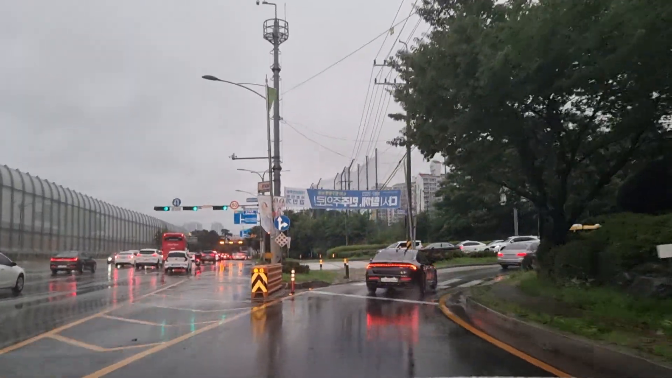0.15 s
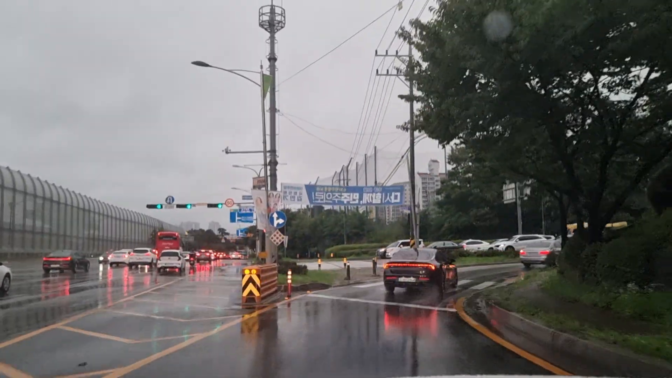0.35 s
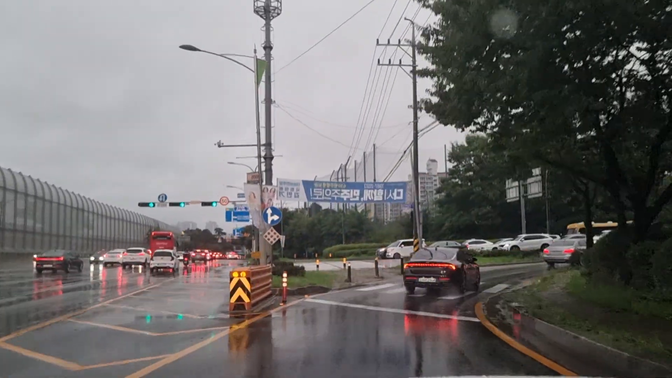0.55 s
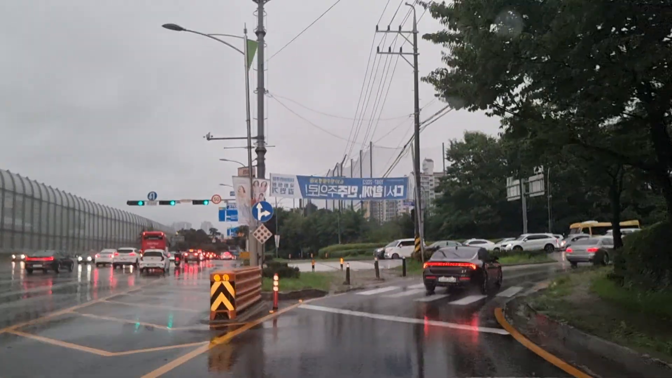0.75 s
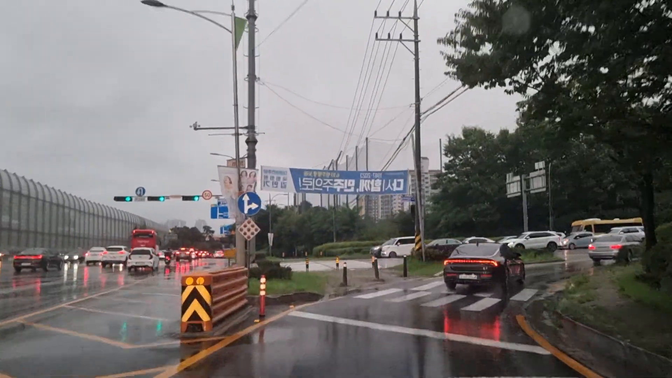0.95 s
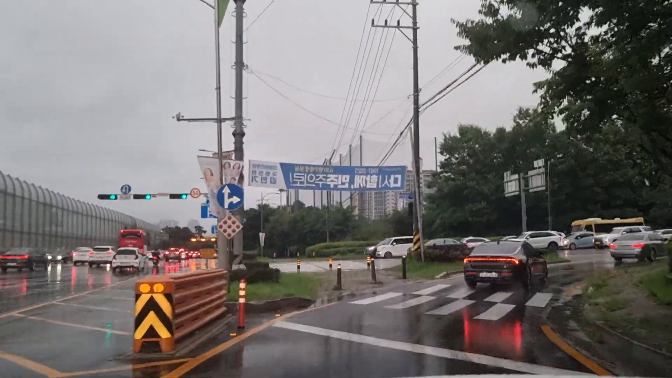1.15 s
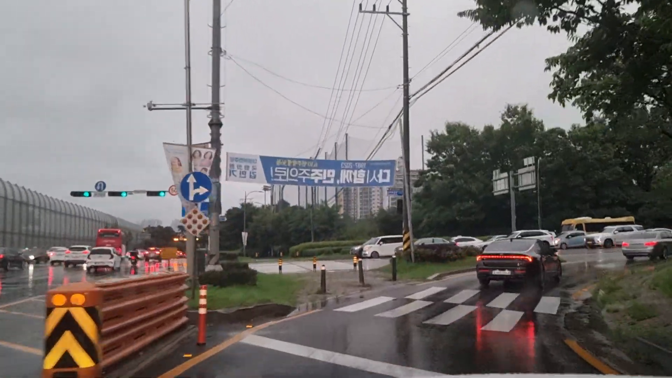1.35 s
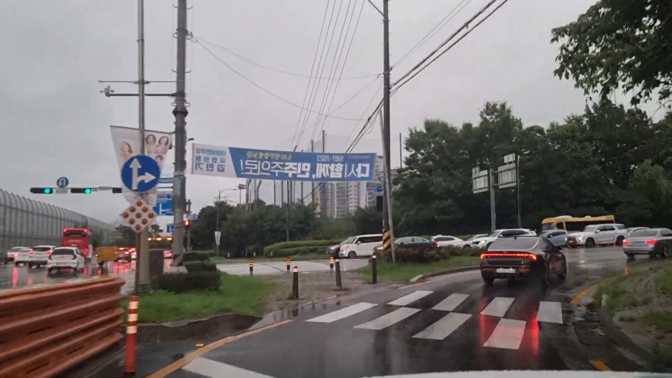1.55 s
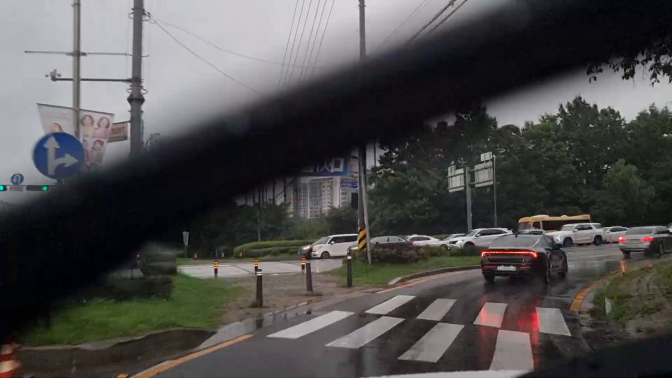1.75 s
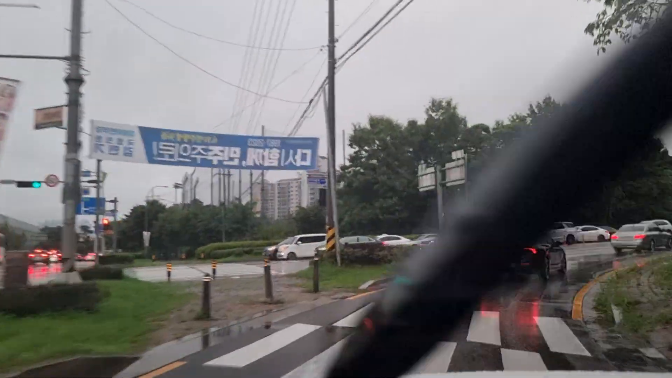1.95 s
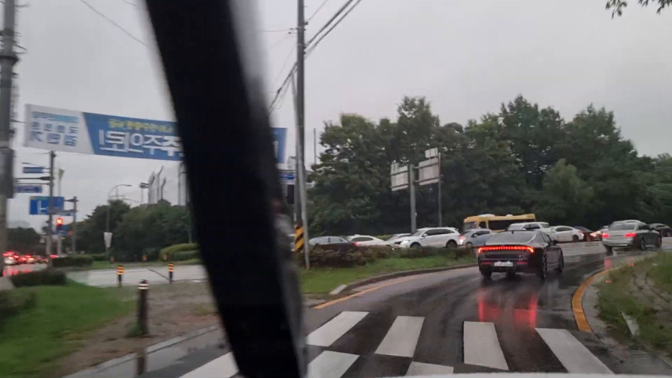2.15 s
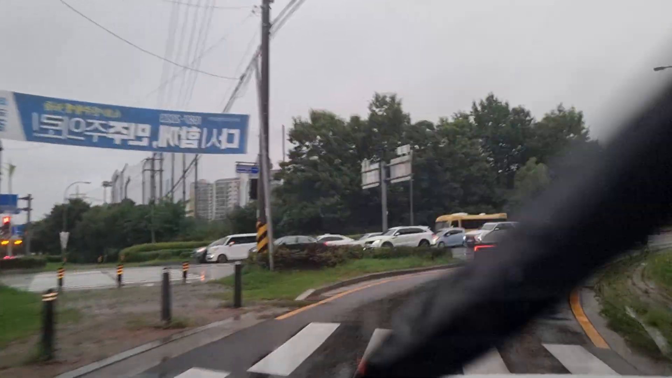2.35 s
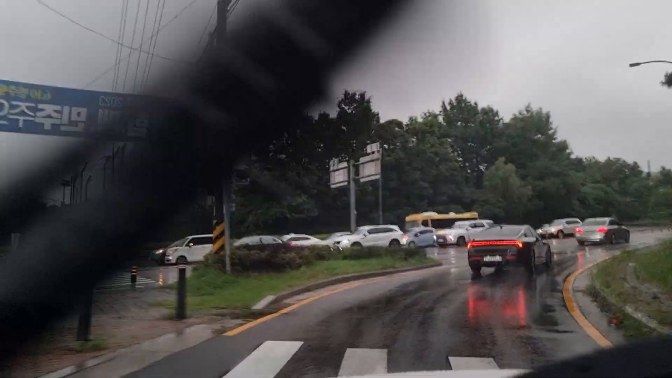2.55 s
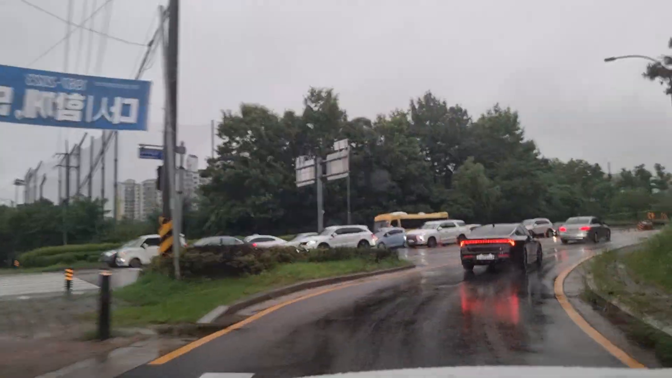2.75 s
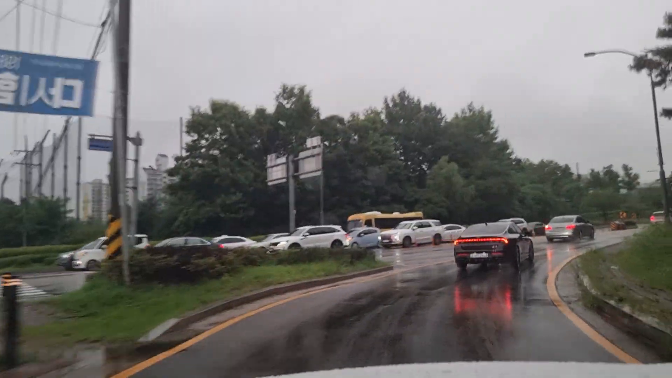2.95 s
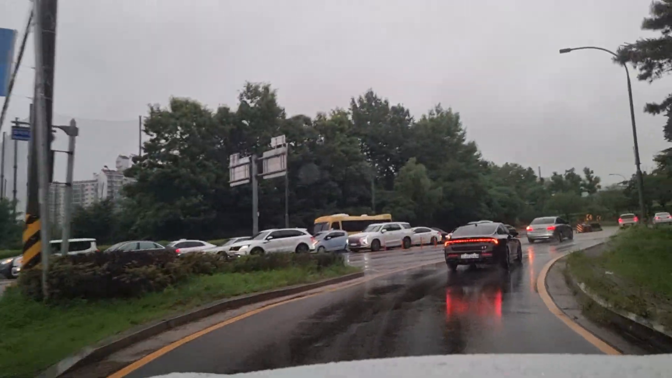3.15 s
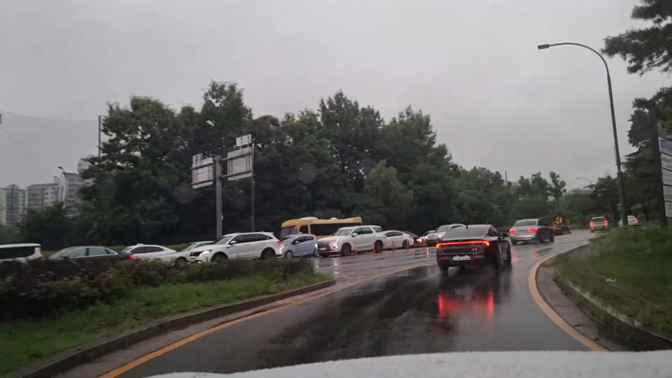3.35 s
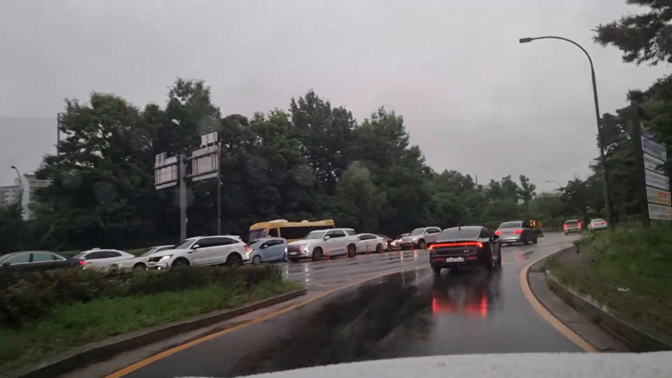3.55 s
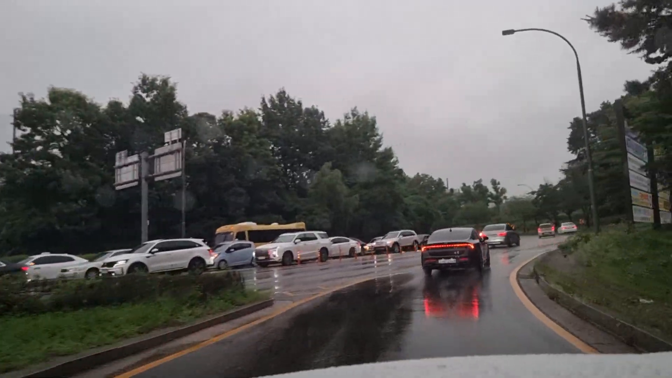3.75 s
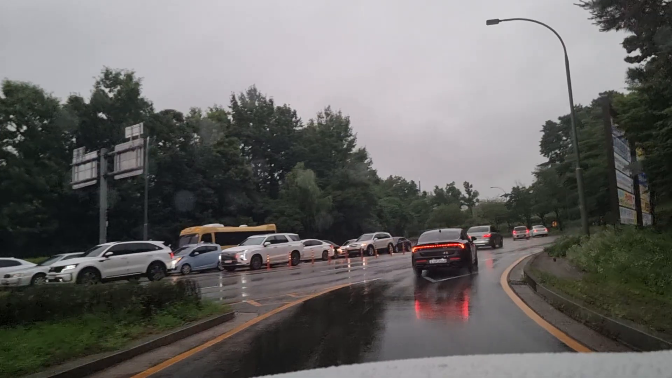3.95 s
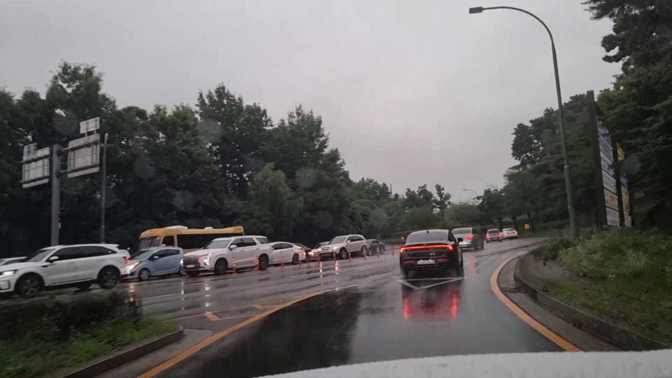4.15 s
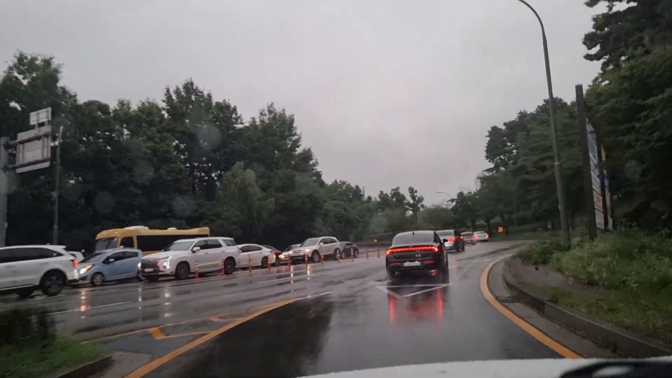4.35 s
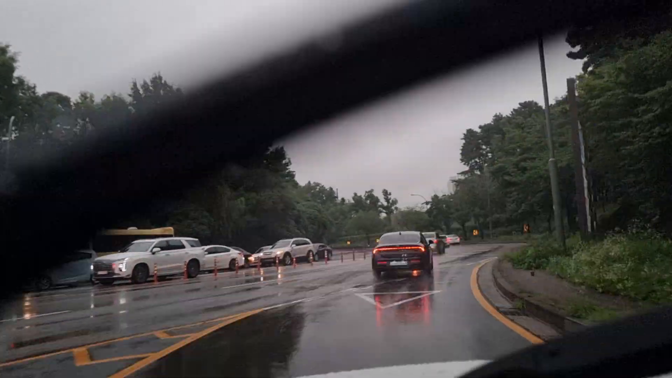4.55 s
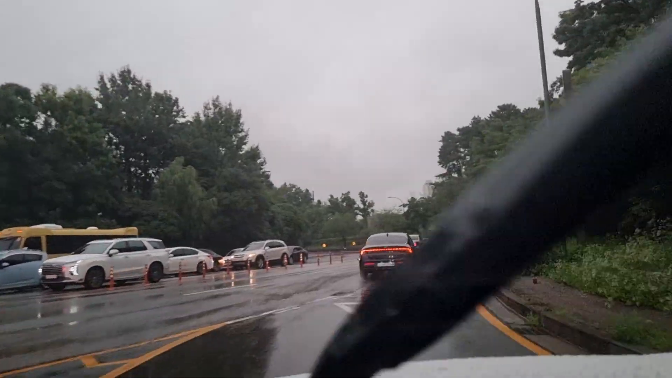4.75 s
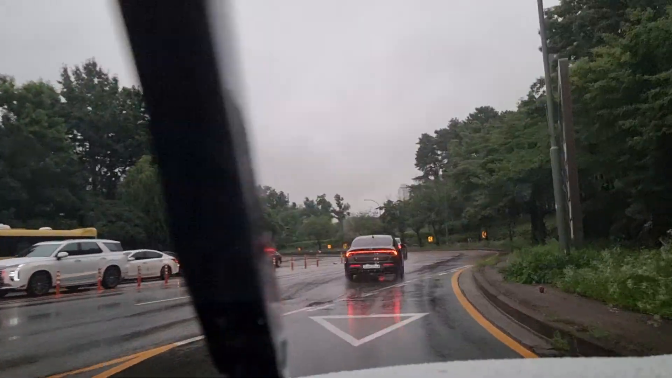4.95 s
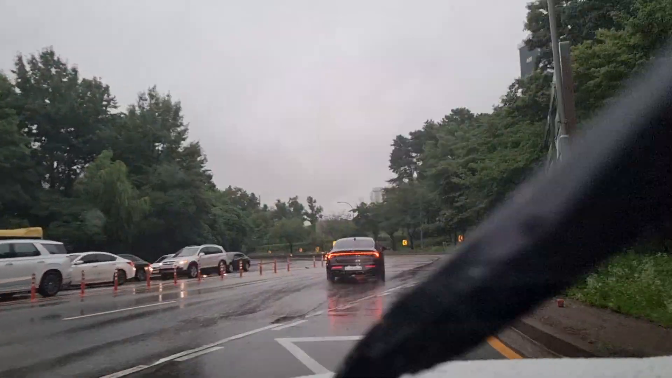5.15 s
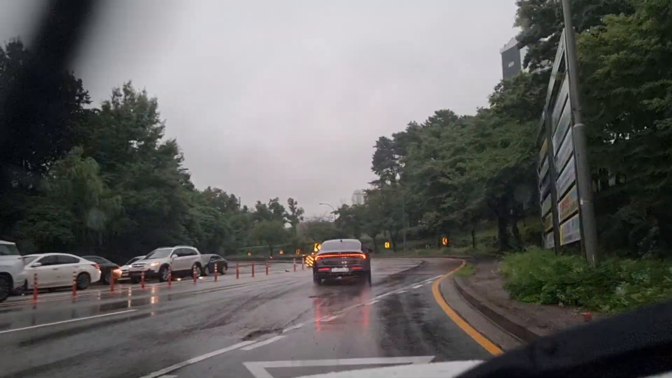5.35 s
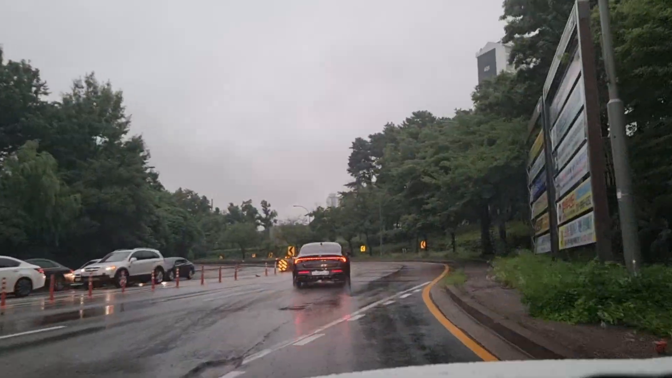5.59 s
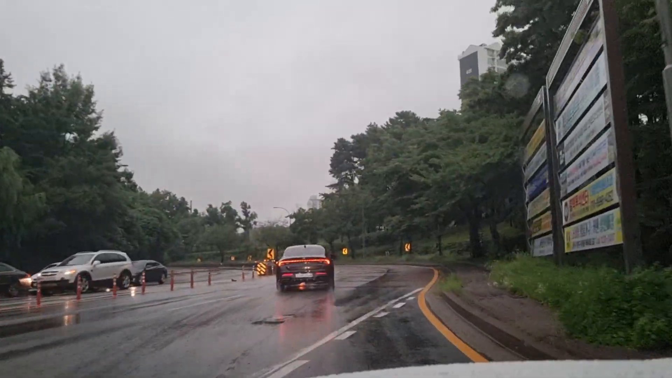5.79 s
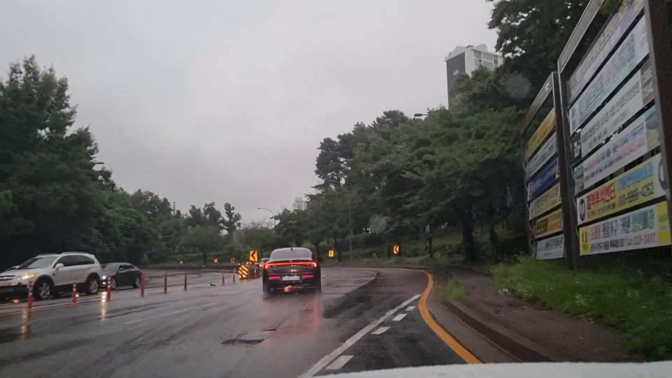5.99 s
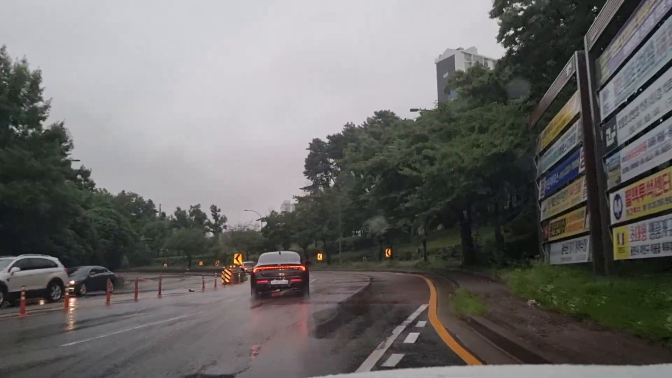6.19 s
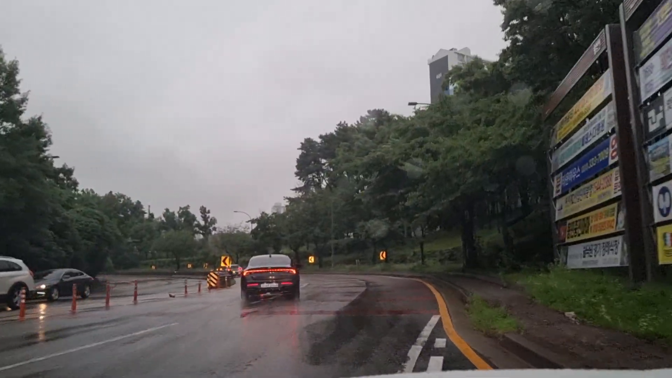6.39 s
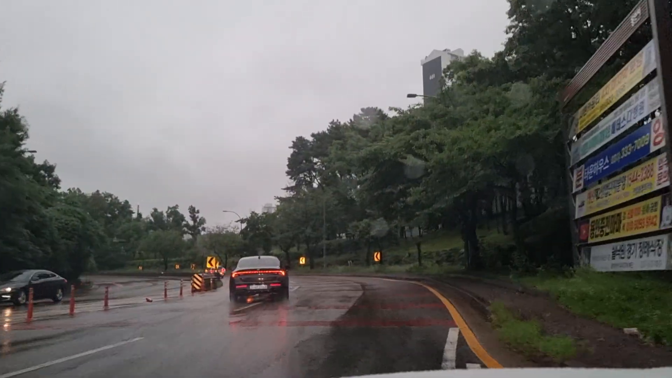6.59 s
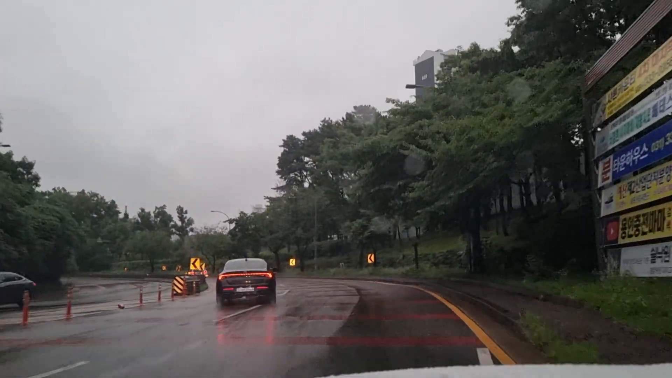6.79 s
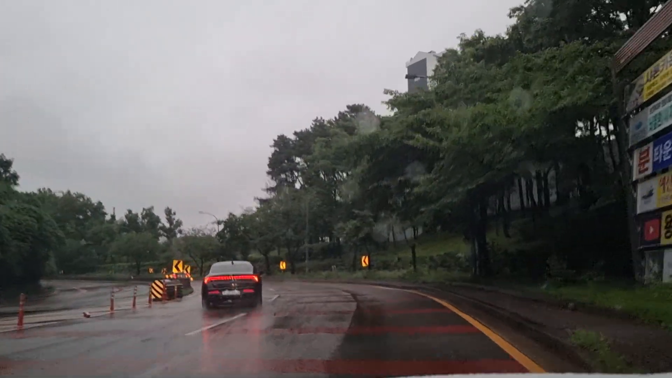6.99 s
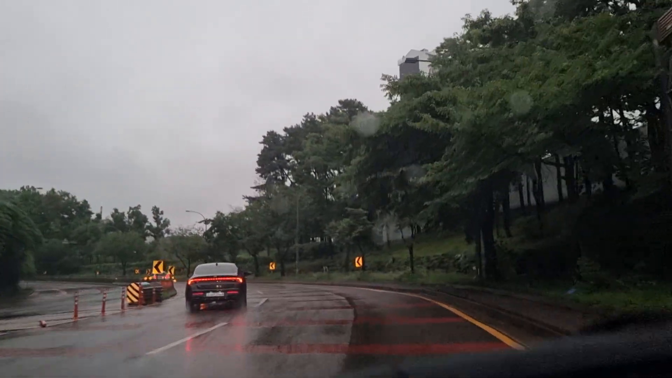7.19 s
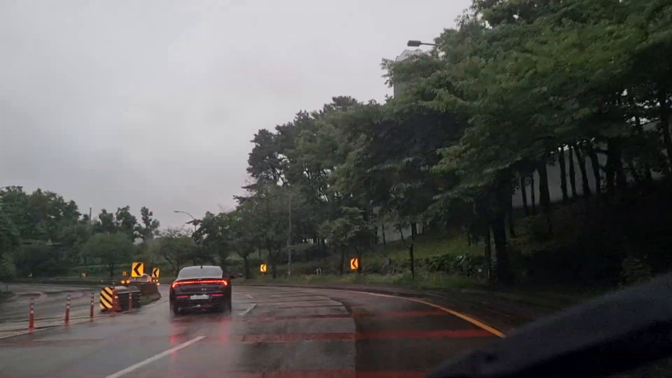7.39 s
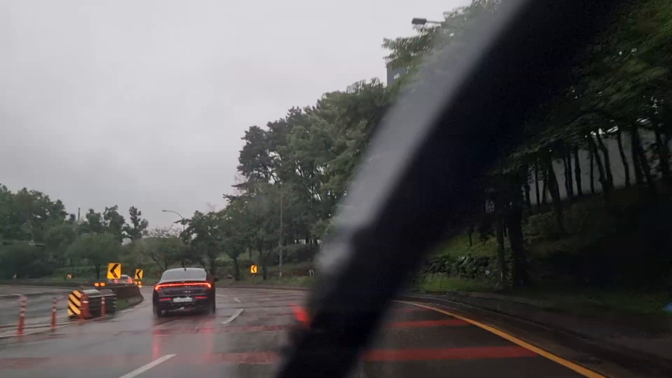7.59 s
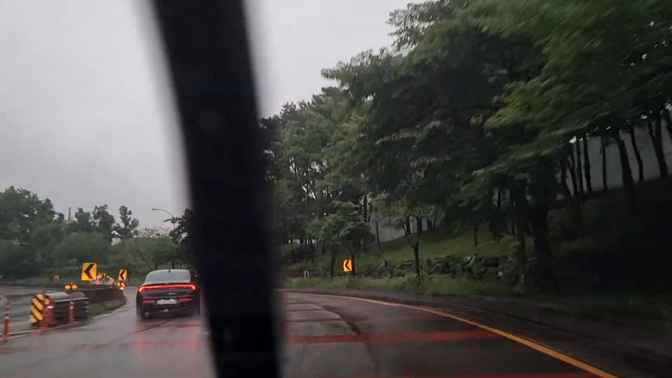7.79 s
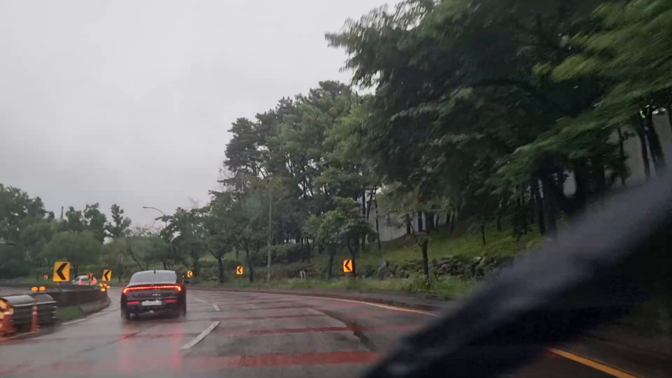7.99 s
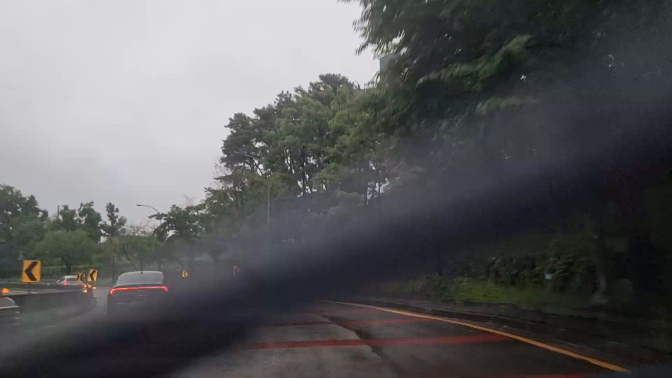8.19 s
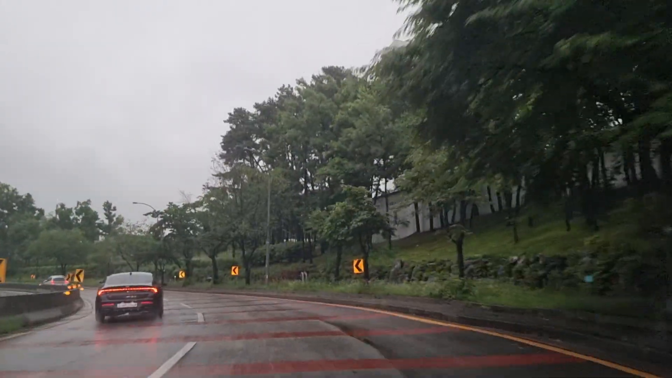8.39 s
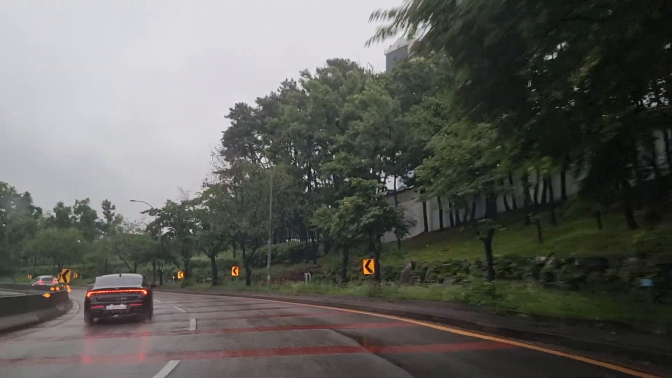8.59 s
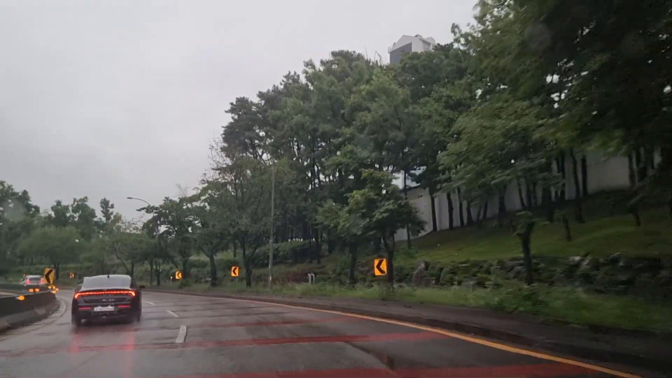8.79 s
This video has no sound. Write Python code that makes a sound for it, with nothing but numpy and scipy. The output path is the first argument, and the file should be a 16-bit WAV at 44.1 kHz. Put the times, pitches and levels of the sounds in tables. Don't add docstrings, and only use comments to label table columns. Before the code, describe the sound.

Inside a moving car in rain, a deep shaking roar of tyres, springs and cabin air runs throughout over a low engine hum. Wipers sweep three times: each begins with a softer flip and ends about seven tenths of a second later in a hard, booming thump that rings the windscreen. Faint spray hisses below; trim clips and drops tick close to the stereo cabin microphone.

```python
import sys
import numpy as np
from scipy import signal
from scipy.fft import rfft, irfft, next_fast_len
from scipy.io import wavfile
from scipy.ndimage import uniform_filter1d, map_coordinates

SR = 44100
rng = np.random.default_rng(int(sys.argv[2]) if len(sys.argv) > 2 else 0)


def transcribe(u):
    v = np.clip(np.atleast_2d(u).T, -1, 1)
    q = np.round(v * 32767).astype(np.int16)
    wavfile.write(sys.argv[1], SR, q)


def magnitude_from_level(level_db):
    exponent = np.asarray(level_db, float) / 20
    return 10 ** exponent


N = 389403

# time in seconds, slap in dB, windscreen ring in dB, squeak in dB,
# second blade after the first in dB.
BLADE_FLIPS = [
    (1.59, -17.5, -8, -51, 0.5),
    (2.3119, -5, -5.5, -36, -2.5),
    (4.386, -23.5, -15, -43, 7.5),
    (5.1068, -4, -3.5, -37.5, -5.5),
    (7.186, -24, -6, -60, 7.5),
    (7.9121, -2.5, -4.5, -41, -11),
]


def unit(x):
    return x / np.sqrt(np.mean(x ** 2) + 1e-20)


def along(points, hz):
    f, v = np.transpose(points)
    return np.interp(np.log(hz + 1), np.log(f + 1), v)


def shape(spectrum):
    return lambda hz: magnitude_from_level(along(spectrum, hz)) * (hz >= spectrum[0][0]) * (hz <= spectrum[-1][0])


def curves(rows):
    s, *columns = np.transpose(rows)
    return [np.interp(np.arange(N) / SR, s, column) for column in columns]


def wobble(rate):
    knots = rng.standard_normal(int(N * rate / SR) + 4)
    return map_coordinates(knots, [np.arange(N) * rate / SR])


def ports(pair, gain):
    # frequency in Hz, left-right likeness from -1 to 1.
    likeness = [(30, 0.98), (60, 0.96), (130, 0.97), (290, 0.53), (450, -0.32), (640, -0.52), (1000, -0.78),
                (1500, -0.28), (2100, 0.011), (3100, -.1), (6800, 0), (15000, 0)]
    # frequency in Hz, left minus right in dB.
    lean = [(30, 2), (60, 4.5), (120, 4.5), (250, 4.5), (500, 1), (1000, 1), (2400, 3), (4400, 2),
            (8100, 4.5), (15000, -3)]
    m = next_fast_len(N + 8192)
    hz = np.fft.rfftfreq(m, 1 / SR)
    turn = np.arccos(np.clip(along(likeness, hz), -1, 1)) / 2
    left, right = magnitude_from_level(along(lean, hz) / 2), magnitude_from_level(-along(lean, hz) / 2)
    middle = np.hypot(np.cos(turn) * (left + right), np.sin(turn) * (left - right)) / 2
    a, b = rfft(pair, m) * [np.cos(turn), np.sin(turn)] * gain(hz) / middle
    return irfft([left * (a + b), right * (a - b)], m)[:, :N]


def rush(gain, patchy_db=0.):
    z = signal.stft(rng.standard_normal((2, N)), nperseg=512)[2]
    field = uniform_filter1d(rng.standard_normal(z.shape[1:]), size=6, axis=0)
    field = uniform_filter1d(field, size=10, axis=1)
    noise = signal.istft(z * magnitude_from_level(patchy_db * unit(field)), nperseg=512)[1][:, :N]
    pair = ports(noise, gain)
    return pair / np.std(pair.mean(0))


def steadied(pair, share):
    swell = np.abs(uniform_filter1d(pair.mean(0) ** 2, size=SR // 8)) + 1e-6
    pair = pair / swell ** (np.clip(share, 0, 1) / 2)
    return pair / np.std(pair.mean(0))


def strikes(times, levels_db, t60s, rise):
    env, t = np.zeros(N + SR), np.arange(SR // 8) / SR
    for s, db, t60 in zip(times, levels_db, t60s):
        env[round(s * SR):][:len(t)] += magnitude_from_level(db - 60 * t / max(t60, .005)) * (1 - np.exp(-t / rise))
    return env[:N]


def road():
    # time in seconds, surface roughness in dB.
    roughness = [(0, -29), (1.42, -27), (1.5, -26), (2.43, -27), (3.1, -28), (3.27, -29), (3.98, -27.5),
                 (4.92, -30), (5.24, -24.5), (5.8, -29.5), (6.47, -27), (6.76, -24), (7.1, -26.5),
                 (7.43, -29.5), (7.65, -25.5), (7.99, -23.5), (8.26, -27), (8.83, -26.5)]
    # time in seconds, level in dB, half length in seconds.
    road_dips = [
        (1.55, -52, 0.078),
        (4.5, -41.5, 1),
        (5.75, -40.5, 0.18),
        (6.47, -35.5, 0.18),
        (6.77, -28.5, 0.13),
        (7.05, -34, 0.21),
        (7.4, -25.5, 0.2),
        (8.28, -33, 0.72),
    ]
    # frequency in Hz, level in dB per Hz.
    spring_spectrum = [(18, -40), (23, -9), (28, 2), (36, -12), (45, -2.5), (56, -10.5), (66, -25)]
    seat_spectrum = [(28, -29.5), (36, -13), (46, 13.5), (56, -14), (66, -23.5)]
    boom_spectrum = [(52, -18), (62, -8), (70, -7), (78, 0), (84, 3.5), (90, -2), (97, -5), (108, -5.5),
                     (114, -17.5), (135, -16), (150, -27.5)]
    tyre_spectrum = [(71, -35.5), (120, -19.5), (135, -2.5), (161, -3.5), (244, -5.5), (290, -11.5),
                     (339, -12.5), (374, -12.5), (410, -22.5), (480, -28), (620, -54), (1060, -120)]
    roar_spectrum = [(250, -24.5), (430, -2), (488, -3), (550, -0.5), (641, -4.5), (674, -10), (797, -7.5),
                     (861, -10.5), (984, -14), (1050, -13.5), (1170, -18), (1680, -19), (2300, -29),
                     (2990, -67), (5060, -120)]
    # centre in Hz, width in Hz, level in dB rms, loudest at this second.
    trim_panels = [(549.4, 14, -61.5, 4.3), (984.4, 50, -68.5, 6.4), (1462, 46, -88.5, 4.6),
                   (335.6, 27.6, -48.5, 7.5)]

    def panel_gain(centre, width):
        return lambda hz: 1 / (1 + ((hz - centre) / width * 2) ** 4)

    boom_db, = curves(roughness)
    t = np.arange(N) / SR
    swing_db = boom_db + 27
    dips = sum(magnitude_from_level(db) * np.exp(-((t - s) / half) ** 2) for s, db, half in road_dips)
    tyres = magnitude_from_level(-35.5 + 0.26 * swing_db) + magnitude_from_level(-13.5) * dips
    roar = magnitude_from_level(-50.5 + 0.31 * swing_db) + magnitude_from_level(-32) * dips
    bumps = wobble(9.0)
    low = (magnitude_from_level(-44.5) + dips) * magnitude_from_level(5.0 + 0.41 * bumps) * steadied(rush(shape(spring_spectrum)), share=0.39)
    low += (magnitude_from_level(boom_db - 11.5) + magnitude_from_level(-6.5) * dips) * magnitude_from_level(bumps) * rush(shape(seat_spectrum))
    low += magnitude_from_level(boom_db + 2.0 + 1.3 * bumps) * steadied(rush(shape(boom_spectrum)), share=.8)
    low += tyres * magnitude_from_level(0.52 + .9 * bumps) * rush(shape(tyre_spectrum), patchy_db=1.2)
    low += roar * magnitude_from_level(0.1 + 0.42 * bumps) * rush(shape(roar_spectrum), patchy_db=1.0)
    for centre, width, db, s in trim_panels:
        swell_db = 6 * np.exp(-((t - s) / 1.3) ** 2)
        low += magnitude_from_level(db + 1.7 * wobble(1.5) + swell_db) * rush(panel_gain(centre, width))
    return low


def engine():
    # time in seconds, firing rate in Hz, level in dB.
    firing = [(0, 47, -26), (.7, 44.19, -23.5), (1.5, 41.08, -23.5), (1.9, 39.58, -33), (2.7, 37.67, -19.5),
              (2.97, 37.18, -22.5), (3.1, 46, -29), (3.6, 47.82, -31), (3.9, 54.52, -22), (4.7, 49.75, -31),
              (5.3, 53.67, -23), (6.4, 53.56, -27), (6.7, 54.7, -22), (7.5, 54.9, -21), (7.9, 55.04, -30.5),
              (8.83, 54.5, -38.5)]
    # multiple of the firing rate, level in dB.
    orders = [(1, -3), (2, -10), (3, -16.5)]
    hz, level_db = curves(firing)
    turn = 2 * np.pi * np.cumsum(hz * (1 + 0.0065 * wobble(6))) / SR
    tone = sum(magnitude_from_level(db + 2.5 * wobble(7)) * np.sin(k * turn) for k, db in orders)
    return np.sqrt(2) * magnitude_from_level(level_db) * tone * magnitude_from_level([[1.5], [-1.8]])


def spray():
    # time in seconds, wetness in dB.
    wetness = [(0, -62.5), (1.72, -61), (3.39, -64), (5.6, -64), (6.34, -65), (7.45, -63), (7.72, -62.5),
               (8.83, -63.5)]
    # start in seconds, length in seconds, level
    # in dB.
    fine_bursts = [(0.11, 0.029, -67), (1.497, 0.33, -85), (2.53, 0.009, -78), (2.563, 0.019, -74),
                   (2.914, 0.029, -67), (6.118, .012, -73), (6.717, 0.013, -75), (5.713, 0.023, -68),
                   (5.761, 0.23, -92), (6.306, 1, -83), (7.107, 0.061, -73.5), (7.366, 0.071, -69.5),
                   (7.605, 0.25, -65), (7.929, 0.15, -71), (8.144, 0.06, -70), (8.501, 0.035, -64.5),
                   (8.44, 0.058, -73), (8.217, 0.047, -80), (8.3, .13, -89), (7.809, .09, -72),
                   (8.56, 0.13, -69.5)]
    # frequency in Hz, level in dB per Hz.
    hiss_spectrum = [(1240, -13), (2100, -6), (2610, -3), (2840, -0.5), (3070, -0.5), (3310, -1.5),
                     (4450, -9.5), (5200, -15), (6760, -44), (11400, -120)]
    rain_spectrum = [(2820, -30.5), (4800, -5), (5200, -1), (6530, 0), (7650, -5.5), (8550, -15.5),
                     (9500, -18), (12400, -47.5), (20900, -120)]
    fine_spectrum = [(5000, -32.5), (8500, -1), (8940, -1), (9680, -7.5), (10300, -4.5), (12700, 1.5),
                     (13500, -2), (15100, 2), (16000, -7.5)]
    mist_spectrum = [(5000, -34), (8500, -2), (10300, -1.5), (12700, 1.5), (15500, -2), (16000, -8)]
    hiss_db, = curves(wetness)
    t = np.arange(N) / SR
    fine = np.zeros(N)
    for s, length, db in fine_bursts:
        outside = np.maximum(2.2 * (s - t), t - s - length) / length
        fine += magnitude_from_level(db - 31 * np.maximum(outside, 0))
    drops = wobble(60)
    wet = magnitude_from_level(hiss_db + drops) * rush(shape(hiss_spectrum))
    wet += magnitude_from_level(hiss_db - 10.5 + .4 * drops) * rush(shape(rain_spectrum))
    wet += fine * magnitude_from_level(-4.5) * rush(shape(rain_spectrum))
    wet += magnitude_from_level(-90.5) * rush(shape(mist_spectrum))
    flutter = magnitude_from_level(0.4 + 1.1 * drops + .5 * wobble(25))
    return wet + fine * flutter * rush(shape(fine_spectrum), patchy_db=2.2)


def rattles():
    # time in seconds, peak in dB, frequency
    # in Hz.
    clip_rings = [(0.3326, -51.5, 2920), (0.7114, -49.5, 2620), (1.4705, -43, 3040), (1.5873, -49, 2900),
                  (1.612, -42.5, 2900), (1.495, -49, 2695), (1.818, -49, 3150), (1.628, -45.5, 2825),
                  (1.651, -45, 2700), (1.661, -39.5, 2740), (1.7954, -46, 3140), (2.2195, -42.5, 2540),
                  (2.3053, -48, 2754), (2.706, -53.5, 3090), (3.1348, -44.5, 3050), (3.463, -51, 3390),
                  (4.5485, -50, 2887), (4.574, -46, 3150), (4.703, -47.5, 2736), (5.0122, -45, 2716),
                  (5.1, -42, 2830), (5.138, -45.5, 3040), (5.3275, -53, 3170), (5.544, -46.5, 3130),
                  (5.573, -44.5, 3300), (5.604, -48, 3190), (5.631, -49.5, 3070), (5.822, -46, 3710),
                  (5.856, -50.5, 3500), (5.915, -56, 4830), (5.952, -54.5, 4820), (5.975, -55, 3400),
                  (5.998, -51, 3780), (6.2687, -55, 2743), (7.349, -54.5, 2800), (7.363, -46, 3320),
                  (7.378, -50, 3190), (7.395, -53.5, 3090), (7.4037, -42.5, 3160), (7.416, -52, 3080),
                  (7.4378, -44.5, 3540), (7.465, -52, 3080), (7.483, -53, 2970), (7.906, -47, 2590),
                  (7.94, -50.5, 2930), (8.3553, -49, 2940), (8.667, -48, 2880),
                  (1.658, -48, 6900), (1.657, -53, 6300), (1.611, -50, 5750), (3.741, -47, 2800),
                  (3.739, -65, 12200), (3.737, -71.5, 15300), (3.762, -68, 9200), (2.903, -57, 9200),
                  (2.907, -51.5, 12000), (2.7, -53, 11000), (.107, -50, 13000), (.126, -58.5, 12200),
                  (5.7095, -50.5, 9200), (5.717, -56, 12500), (5.711, -61, 14700), (7.612, -56, 4500),
                  (7.625, -52, 3000), (7.638, -50.5, 4800), (7.655, -52.5, 4100), (7.2, -55, 6500),
                  (7.812, -58, 6400), (5, -44, 1400), (5.3, -53, 5000), (4.9, -54, 4800),
                  (5.998, -54.5, 4800)]
    rings = clip_rings
    out, t = np.zeros((2, N + SR)), np.arange(SR // 10) / SR
    for (s, db, hz), phase in zip(rings, rng.uniform(0, 2 * np.pi, (len(rings), 6))):
        drift = .09 * np.cumsum(rng.standard_normal((3, len(t))), axis=1)
        modes = [(1, 5.5), (1.08, -3.5), (2.1, -14 if hz < 4000 else -60)]  # (frequency ratio, dB)
        ring = 0
        for k, (ratio, level_db) in enumerate(modes):
            port_phase = np.array([[0], [phase[2 * k + 1] - np.pi]]) / 2
            turn = 2 * np.pi * ratio * hz * t + drift[k] + phase[2 * k] + port_phase
            ring = ring + magnitude_from_level(level_db) * np.sin(turn)
        envelope = magnitude_from_level(db - 4 - 60 * t / .032) * (1 - np.exp(-t / 0.0015))
        out[:, round(s * SR):round(s * SR) + len(t)] += envelope * ring
    return out[:, :N] * magnitude_from_level([[1.8], [-1.8]])


def ticks():
    # time in seconds, size in dB, low knock over it in dB, top over it in
    # dB.
    near_ticks = [(0.148, -56, 13.5, -8), (0.336, -60.5, 14, -14.5), (5.855, -69, 7, -5),
                  (1.262, -57, 8, -19), (1.475, -66.5, 14, -2.5), (1.661, -56, 2, -25),
                  (1.7948, -58.5, 15, -6.5), (2.4529, -57, -3.5, -22), (2.7017, -42.5, 19, -7.5),
                  (5.822, -62.5, 15, -8), (3.4608, -47.5, 10, -11.5), (3.518, -51.5, -2, -11.5),
                  (0.7128, -59.5, 6, -15), (3.726, -61, 8, -6), (4.2973, -59, 8, -8.5),
                  (4.5473, -57, 10, -8.5), (4.574, -60, 1, -9), (4.7, -58.5, 12.5, -8.5),
                  (5.333, -58, 11.5, -7), (5.5422, -56, 6, -4), (5.7835, -65, 16, -5),
                  (5.6011, -57, 13, -9), (5.6555, -62, 5, -10), (5.7108, -69, 22, 10), (5.7523, -58, 9, -1),
                  (5.953, -62.5, 9, -11), (5.999, -61, 11, -14.5), (6.1496, -58.5, 10, -8.5),
                  (6.262, -60, 13, -5), (7.3648, -72, 18, 7),
                  (5.573, -57.5, 4, -10), (5.583, -66, 2, -11), (5.625, -62, 2, -8), (5.636, -68, 2, -11),
                   (5.689, -70, 2, -10), (5.808, -63, 2, -8), (5.831, -65, 2, -2.5), (5.878, -67, 2, -4),
                   (5.908, -66.5, 0, -3.5), (5.918, -63, 1, -8), (5.9399, -62, 2, -10),
                   (5.965, -66.5, 2, -5.5), (5.978, -65, 2, -11), (5.988, -65, 1, -14),
                   (6.008, -68, 2, -4.5), (4.3087, -58, 8, -8.5), (4.342, -65, 2, -7), (4.418, -57, 7, -8),
                   (4.428, -62.5, 2, -8), (4.454, -70, 2, -1), (4.539, -63, 2, -8), (4.6076, -63, 3, -9),
                   (4.694, -63, 4, -15), (7.076, -70, 16.5, -5.5), (7.481, -66, 11, -4),
                   (7.44, -64, 7, -12), (8.3898, -71, 6, -10), (8.4487, -63.5, 2, -10.5),
                   (1.486, -63, 4, -1.5), (1.59, -59, 18, -9), (3.672, -61, -1, -7), (3.702, -65, 0, -5.5),
                   (3.512, -65, 1, -4), (3.766, -70, -3, -3)]
    # seconds after the flip, size in dB, low knock in dB, top in dB.
    lift_ticks = [(-.003, -57, 3.3, -4), (.003, -61.5, 3.3, -6), (.01, -61.5, 3, -4.5), (.021, -67, 12, -9)]
    turn_ticks = [(-.098, -48.5, 6.4, -18.5), (-.09, -59.5, 6, -16), (-.008, -51.5, 6.9, -7),
                  (.008, -56, 5.3, -3)]
    # frequency in Hz, level in dB per Hz.
    bands = [
        [(900, -24), (1400, -1.5), (2000, -16.5), (2900, 0.5), (3500, -3.5), (4500, -5.5), (5200, -35)],
        [(4000, -40), (4600, 5), (7500, 3.5), (8500, -6), (9000, -39)],
        [(8000, -43), (8800, 0.5), (12000, -7.5), (15500, -4), (16500, -42.5)],
    ]
    arms = []
    for k, flip in enumerate(BLADE_FLIPS):
        for lag, *rest in (turn_ticks if k % 2 else lift_ticks):
            arms.append((flip[0] + lag, *rest))
    s, size_db, low_db, top_db = np.transpose(near_ticks + arms)
    t60 = 0.038 * magnitude_from_level(-0.45 * np.maximum(size_db + 57.0, 0))
    out = np.zeros((2, N))
    for over_db, band in zip((low_db - 6.5, 0, top_db), bands):
        level_db = size_db + over_db
        burst = strikes(s, level_db, t60, rise=0.0015)
        burst += strikes(s, level_db - 19, 0 * s + .1, rise=0.0053)
        out += burst * rush(shape(band), patchy_db=1.5)
    return out


def showers():
    # start in seconds, end in seconds, drops a second, level in dB.
    clumps = [
        (1.46, 1.7, 140, -65),
        (3.714, 3.776, 220, -64.5),
        (5.542, 5.67, 500, -69.5),
        (5.779, 6.017, 500, -70),
        (7.36, 7.462, 450, -67.5),
        (7.595, 7.703, 150, -75.5),
    ]
    # frequency in Hz, level in dB per Hz.
    patter_spectrum = [(2000, -31), (2600, 2.5), (3300, 1), (4500, 0), (5500, -6), (7500, -13.5),
                       (9000, -24.5), (15500, -25), (16500, -45)]
    out = np.zeros((2, N))
    for start, end, rate, db in clumps:
        draw = rng.uniform(size=(160, 2))
        s = start + np.cumsum(-np.log(draw[:, 0])) / rate
        keep = s < end
        size_db = db + 8 * draw[keep, 1]
        out += strikes(s[keep], size_db, 0 * size_db + 0.016, rise=0.0004)
    return out * rush(shape(patter_spectrum), patchy_db=2.5)


def wipers():
    second_blade_s = (.023, 0.01563)
    # frequency in Hz, level under the
    # slap in dB, t60 in seconds.
    arm_modes = [(265, -25.5, .14), (339, -20.5, 0.12), (593, -22, 0.047), (1220, -34, 0.055),
                 (1488, -41, 0.048), (2250, -47, .05), (4250, -41.5, .031)]
    opposed_arm_modes = [(135, -14, .16), (600, -19, .06), (790, -20, 0.063), (950, -22, .07), (1180, -23, .06),
                         (1450, -32, .05)]
    chatter_db = (-19, -11, -21.5, -10.5, -24, -12.5)
    # frequency in Hz, level in dB per Hz.
    chatter_spectrum = [(200, -26), (260, -4.5), (400, -9.5), (480, -14.5), (590, -10.5), (720, -20.5),
                        (900, -25), (1250, -27), (1800, -33), (2400, -38.5), (3200, -54.5), (5000, -52),
                        (6000, -78.5)]
    squeak_spectrum = [(5500, -41), (7000, 12), (7800, 5), (9000, 8.5), (10200, -8.5), (12000, -47)]
    thump, opposed, t = np.zeros(N + SR), np.zeros(N + SR), np.arange(SR // 2) / SR
    u = t / .0042
    slap = -u * np.exp((1 - u ** 2) / 2) * np.sin(2 * np.pi * 160 * t)
    swell = 1 - np.exp(-(t / .036) ** 3)
    screen = -np.sin(2 * np.pi * 83.5 * t) * magnitude_from_level(10.5 - 60 * t / .14) * swell
    arm_rise = (t / 0.009) ** 2 / (1 + (t / 0.0066) ** 2)
    arm = sum(magnitude_from_level(db + 9.5 - 60 * t / t60) * arm_rise * np.sin(2 * np.pi * hz * t) for hz, db, t60 in arm_modes)
    opposed_rise = 1 - np.exp(-t / .003)
    across = sum(magnitude_from_level(db - 60 * t / t60) * opposed_rise * np.sin(2 * np.pi * hz * t) for hz, db, t60 in opposed_arm_modes)

    def add(track, s, sound):
        track[round(s * SR):][:len(t)] += sound

    for k, (s, slap_db, ring_db, _, second_db) in enumerate(BLADE_FLIPS):
        lag = second_blade_s[k % 2]
        add(thump, s, magnitude_from_level(ring_db) * screen)
        add(thump, s + .001, magnitude_from_level(slap_db) * (slap + arm))
        add(thump, s + .001 + lag, magnitude_from_level(slap_db + second_db) * (slap + magnitude_from_level(-9.5) * arm))
        add(opposed, s, magnitude_from_level(slap_db) * across)
        add(opposed, s + lag, magnitude_from_level(slap_db + second_db) * across)
    s, slap_db, _, squeak_db, _ = np.transpose(BLADE_FLIPS)
    chatter = strikes(s - .009 + .016 * (slap_db < -15), chatter_db, 0 * s + .095, rise=.03)
    chatter = chatter * rush(shape(chatter_spectrum), patchy_db=1)
    squeak = strikes(s + .002 + .006 * (slap_db > -15), squeak_db - 10.5, 0 * s + 0.069, rise=0.00088)
    squeak = squeak * rush(shape(squeak_spectrum))
    return thump[:N] * magnitude_from_level([[2.2], [-3]]) + opposed[:N] * [[1], [-1]] + chatter + squeak


def big_drop():
    # frequency in Hz, level in dB, t60 in seconds.
    roof_modes = [(1560, -3, .029), (1850, -5, .025), (2160, -7, .027), (2770, -3, .035), (3150, -2, .03),
                  (4300, -5, .022), (4870, -3, .025), (5400, -5, .022), (5870, -1.5, .022),
                  (6500, -6, .022), (7300, -10, .025)]
    out, t = np.zeros(N + SR), np.arange(SR // 10) / SR
    ring = np.zeros(len(t))
    for hz, db, t60 in roof_modes:
        ring += magnitude_from_level(db - 60 * t / t60) * np.sin(2 * np.pi * hz * t + rng.uniform(0, 2 * np.pi))
    out[round(2.7012 * SR):][:len(t)] = magnitude_from_level(-39.5) * (1 - np.exp(-t / 0.00067)) * ring
    return out[:N] * magnitude_from_level([[1.5], [-1.5]])


def jolts():
    # time in seconds, level in dB, frequency in Hz.
    edges = [
        (3.108, -12, 43.5),
    ]
    out, t = np.zeros(N + SR), np.arange(SR // 4) / SR
    for s, db, hz in edges:
        envelope = magnitude_from_level(db + 8.5 - 60 * t / 0.12) * (1 - np.exp(-(t / 0.0084) ** 2))
        out[round(s * SR):][:len(t)] += envelope * np.cos(2 * np.pi * hz * t)
    return out[:N] * magnitude_from_level([[1.5], [-1.8]])


def scene():
    running = road() + engine() + spray()
    small = rattles() + ticks() + showers()
    return running + small + wipers() + big_drop() + jolts()


def top_cut(x):
    return signal.sosfilt(signal.butter(12, 15840, fs=SR, output="sos"), x)


def record(dry):
    held = dry / (1 + np.abs(dry / .99) ** 12) ** (1 / 12)
    return top_cut(held)


dry = scene()
out = record(dry)
transcribe(out)
```